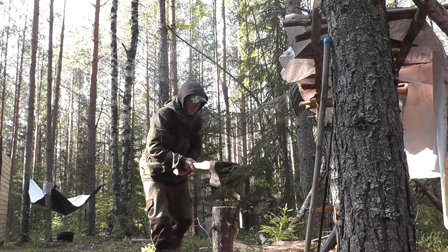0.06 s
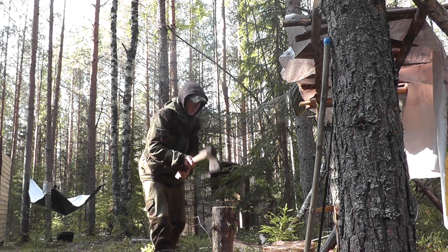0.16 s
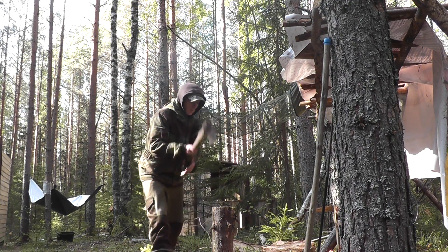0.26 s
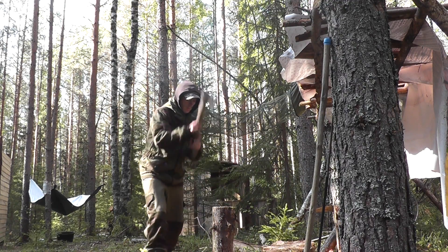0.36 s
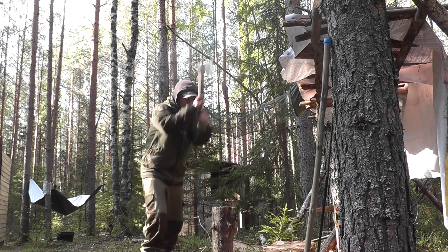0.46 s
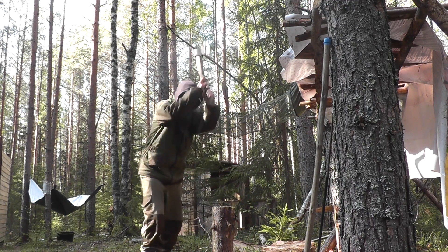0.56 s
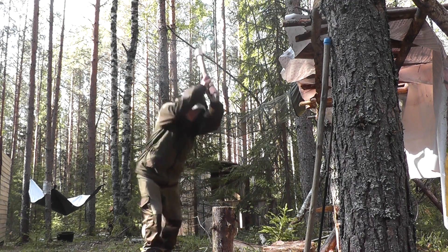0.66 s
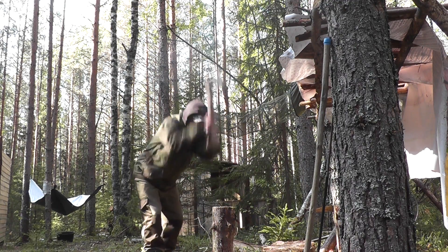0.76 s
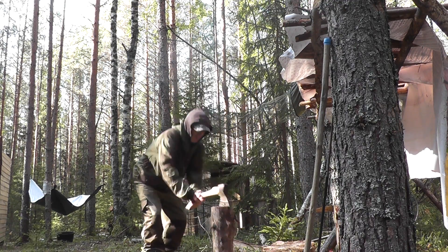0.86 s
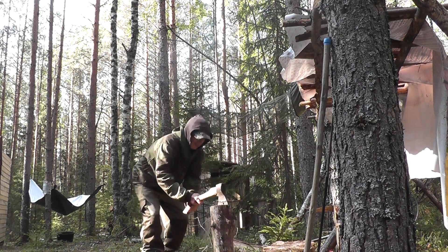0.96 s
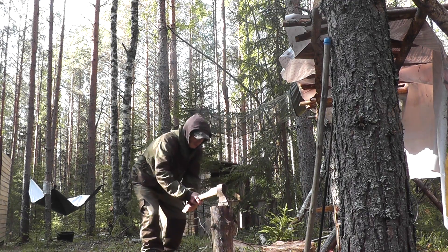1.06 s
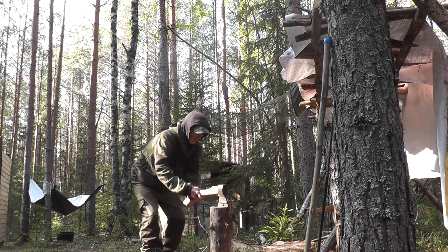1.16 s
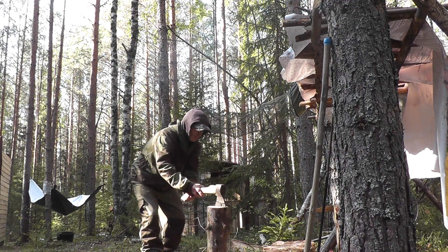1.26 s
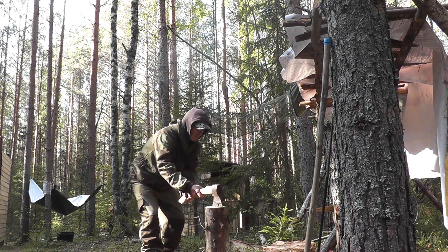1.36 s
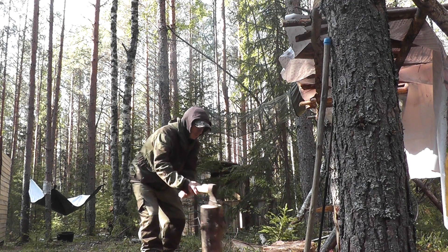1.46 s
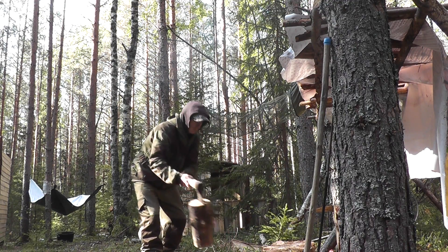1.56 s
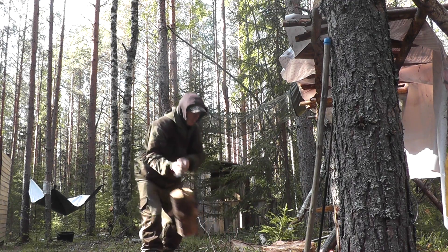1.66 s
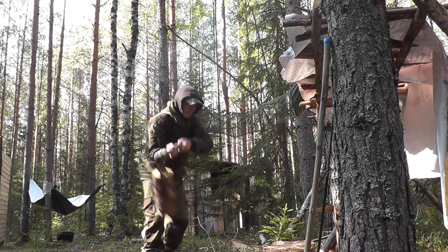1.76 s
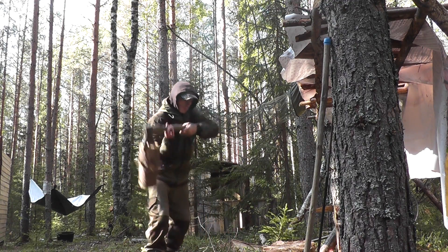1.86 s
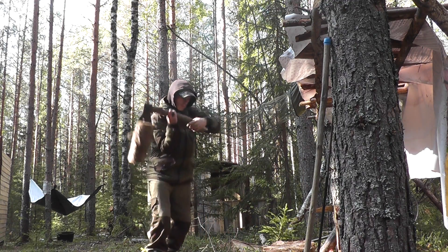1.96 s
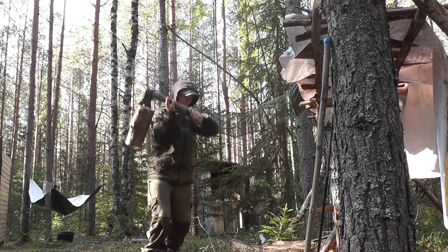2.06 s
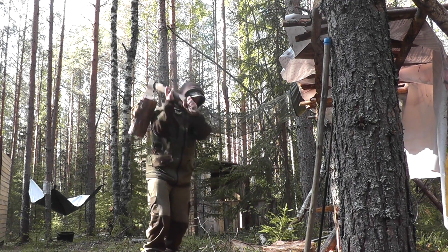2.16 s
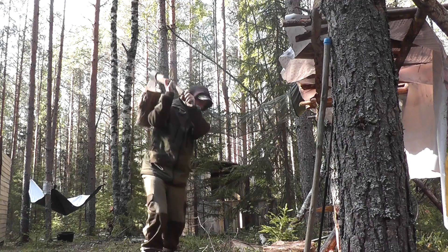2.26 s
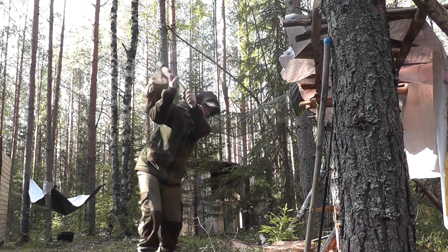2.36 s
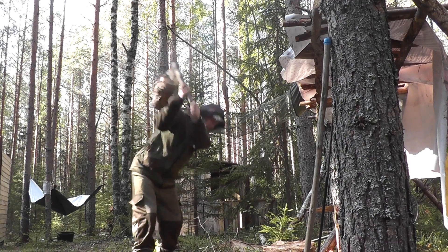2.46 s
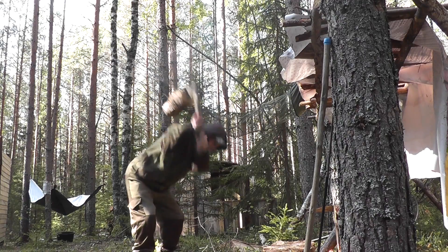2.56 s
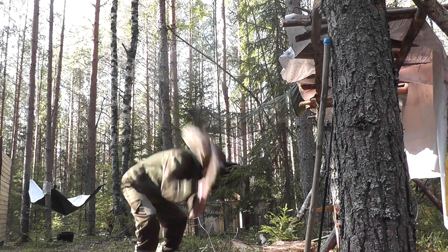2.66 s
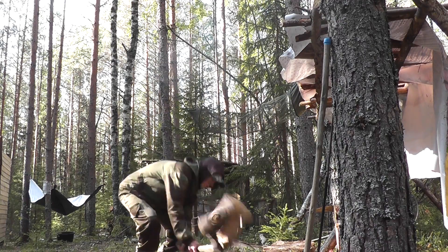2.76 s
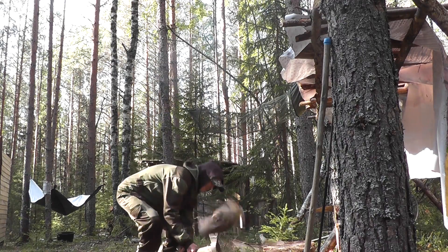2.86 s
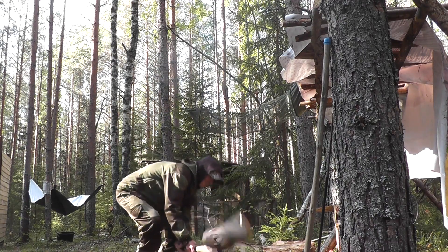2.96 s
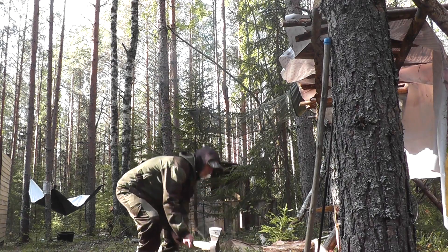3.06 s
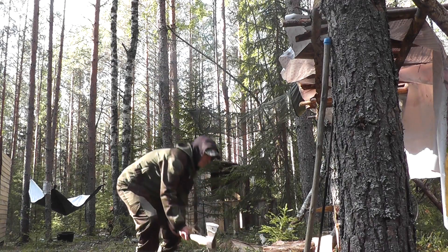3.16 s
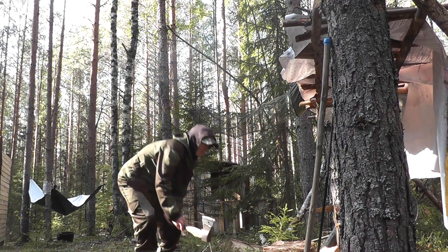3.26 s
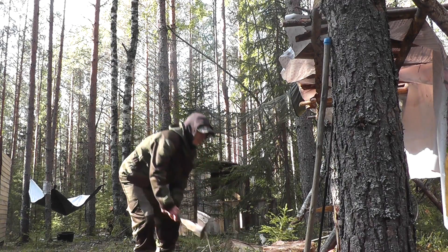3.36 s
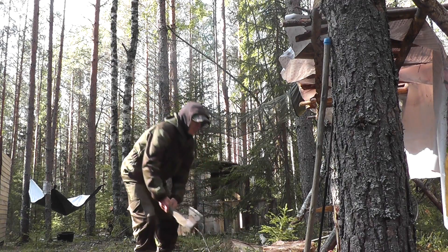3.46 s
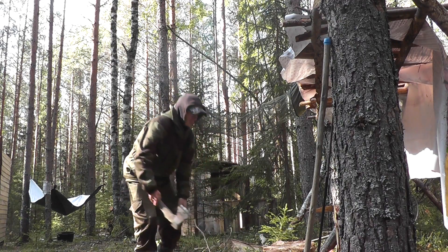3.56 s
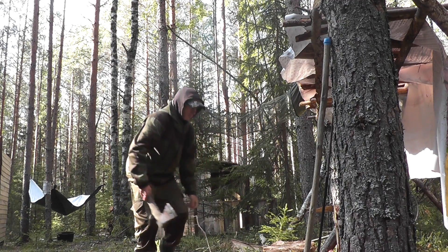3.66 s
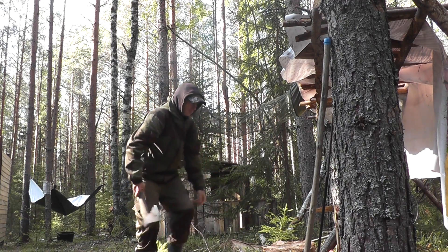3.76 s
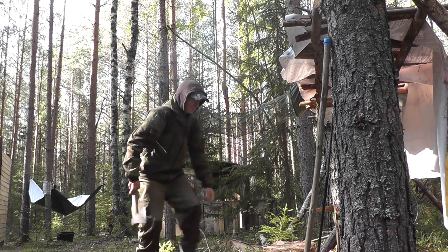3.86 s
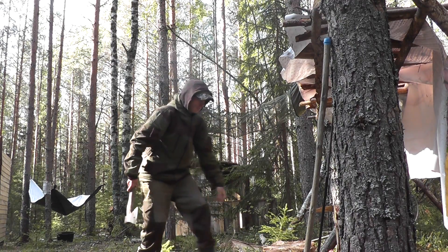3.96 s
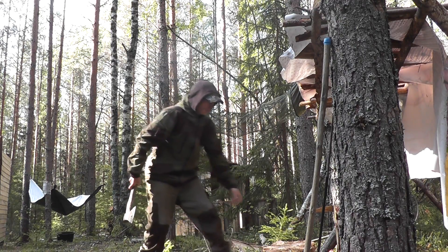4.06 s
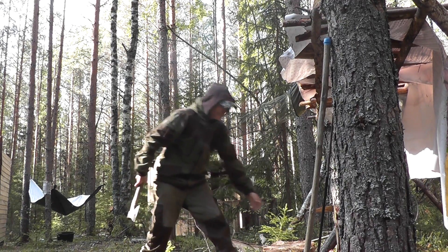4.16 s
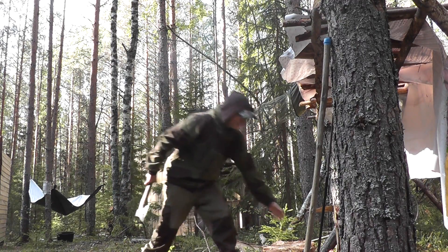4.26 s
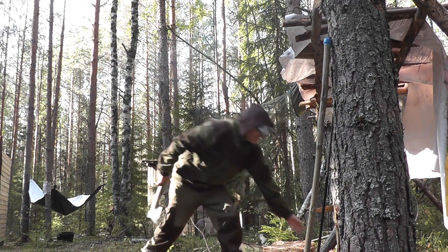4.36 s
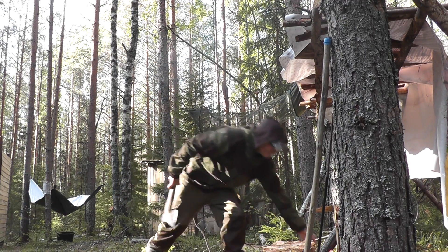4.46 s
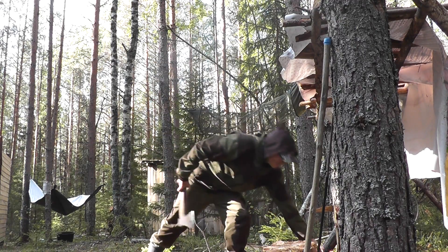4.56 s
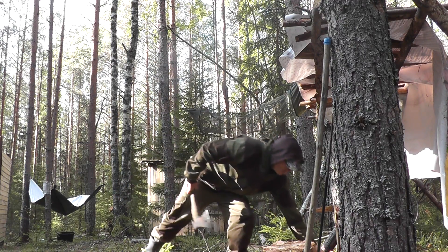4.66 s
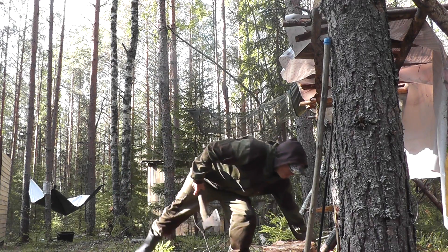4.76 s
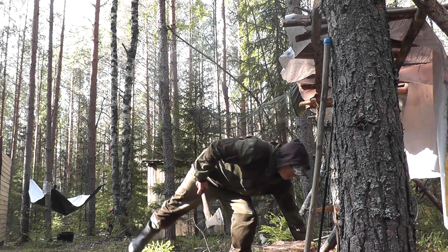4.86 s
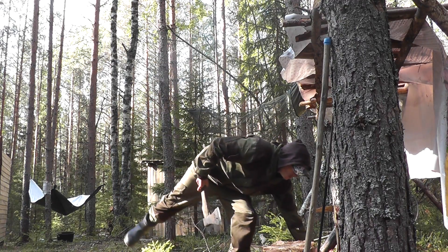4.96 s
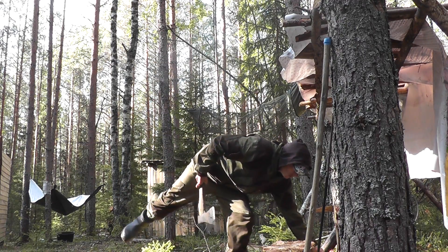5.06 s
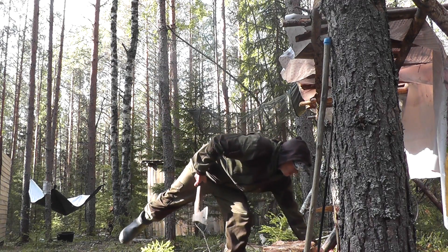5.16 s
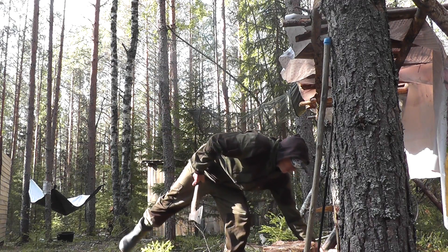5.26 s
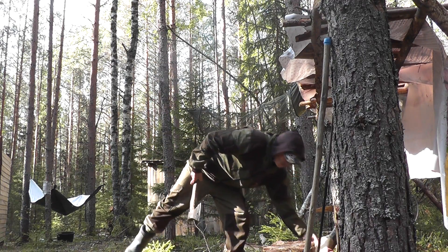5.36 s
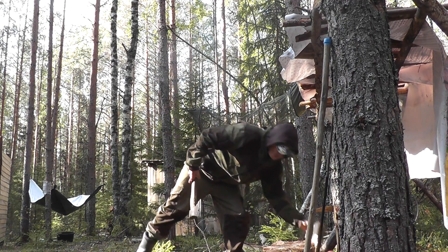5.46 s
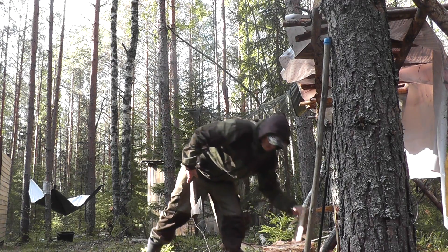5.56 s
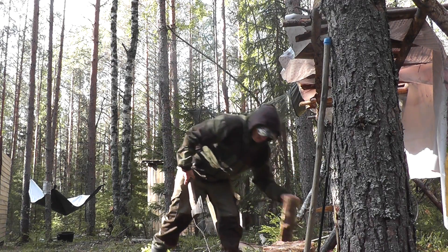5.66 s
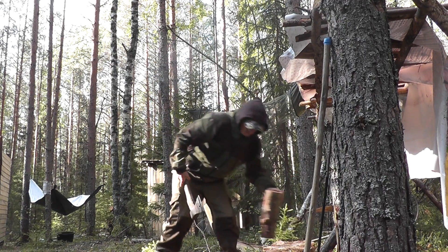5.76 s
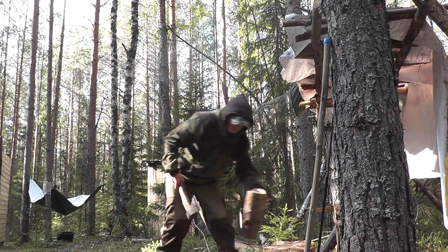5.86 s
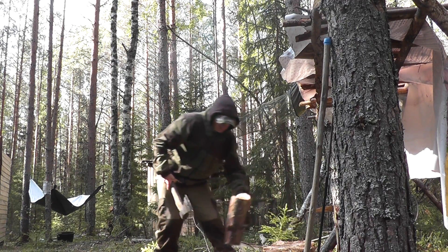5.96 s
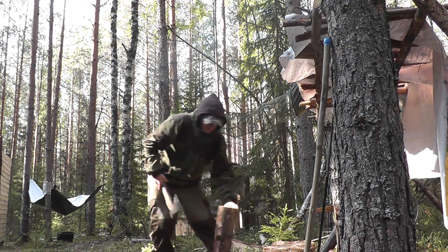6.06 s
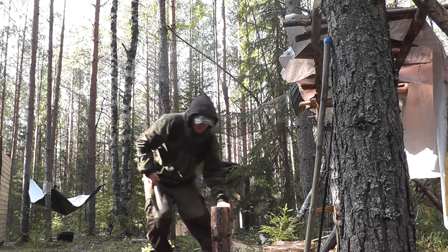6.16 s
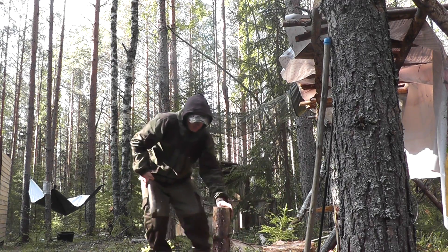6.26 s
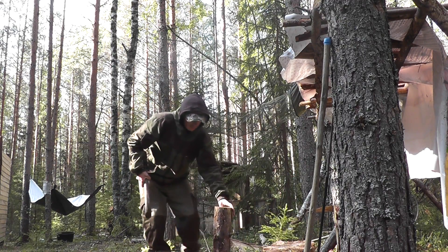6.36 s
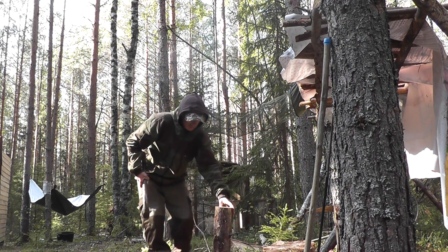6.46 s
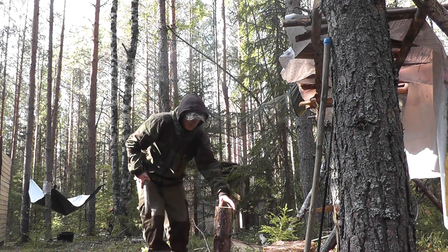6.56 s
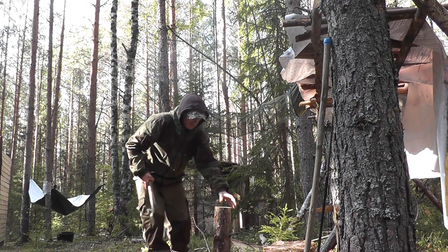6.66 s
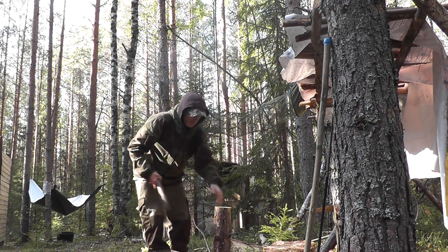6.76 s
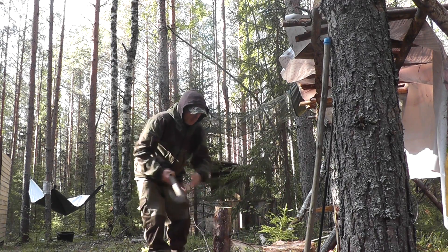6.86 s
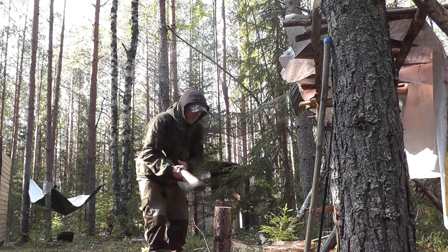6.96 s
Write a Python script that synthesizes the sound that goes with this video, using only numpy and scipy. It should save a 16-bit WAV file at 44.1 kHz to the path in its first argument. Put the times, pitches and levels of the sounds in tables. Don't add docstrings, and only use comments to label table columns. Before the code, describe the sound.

Close stereo pickup beside a chopping stump in a pine forest. Soft wind and jacket rustle, then a hard hatchet chop with a stump boom and long thin echo from the trunks. A second blow cracks the log open; pieces knock and tumble on wood and soil. Afterwards only cloth, scuffing boots, faint birds and a light wooden set-down.

```python
import sys
import numpy as np
from scipy import signal
from scipy.fft import rfft, irfft, next_fast_len
from scipy.io import wavfile
from scipy.ndimage import uniform_filter1d

SR = 44100
rng = np.random.default_rng(int(sys.argv[2]) if len(sys.argv) > 2 else 0)


def log_audio(samples):
    frames = np.atleast_2d(samples).T
    limited = np.clip(frames, -1, 1)
    pcm = np.round(limited * 32767).astype(np.int16)
    wavfile.write(sys.argv[1], SR, pcm)


def elevation(decibels):
    levels = np.asarray(decibels, float)
    return 10 ** (levels / 20)


N = 309141

# [f/Hz, level/dB per Hz]
WIND_COLOUR = [(15, -31), (25, 0), (236, 1.5), (545, -1.5), (863, -6), (988, -9.5), (1520, -14),
               (2220, -23), (3340, -21.5), (4490, -21), (5000, -21.5), (8140, -25), (16000, -34)]
# [f/Hz, likeness/1]
FIELD_LIKENESS = [(60, 0.39), (180, -0.65), (550, -0.15), (1650, 0.12), (4970, 1), (15000, -0.3)]

# [peak t/s, rise/s, fall/s, rub level/dB, hiss
# level/dB]
MOVEMENTS = [(.12, 0.063, 0.036, -55, -60), (.252, 0.13, 0.037, -57.5, -67), (.408, 0.12, 0.038, -52, -60.5),
             (.57, 0.16, 0.045, -50, -57.5), (.78, 0.64, 0.06, -60.5, -66.5),
             (.91, 0.094, 0.13, -56.5, -61.5), (1.21, .05, 0.54, -54, -62), (1.6, 0.28, 0.12, -64.5, -74.5),
             (2.014, 0.15, 0.092, -59, -61.5), (2.356, 0.098, .12, -53.5, -58),
             (2.54, 0.075, 0.078, -63, -61), (2.74, 0.11, 0.061, -61.5, -63), (3.21, .005, 0.16, -69, -46.5),
             (3.39, 0.013, 0.099, -72.5, -50),
             (3.44, 0.054, 0.19, -51, -61.5), (3.67, 0.12, 0.44, -61, -66), (3.891, 0.035, .01, -46.5, -62),
            (4.0, 0.032, 0.31, -58.5, -66.5), (4.139, 0.0088, 0.043, -55.5, -59),
            (4.27, 0.064, .03, -57, -64.5), (4.35, 0.034, 0.045, -60.5, -65.5),
            (4.55, 0.28, 0.14, -62.5, -66), (4.75, 0.049, 0.27, -69.5, -65),
            (5.04, 0.043, 0.032, -67.5, -65.5), (5.4, 0.24, 0.29, -70.5, -67.5),
            (5.82, 0.033, 0.034, -52.5, -62), (6.15, 0.093, 0.24, -57, -63),
            (6.34, 0.051, .015, -65.5, -63), (6.44, 0.032, 0.096, -54, -57.5),
            (6.49, 0.037, 0.074, -72, -55), (6.55, 0.065, 0.043, -54.5, -60),
            (6.923, 0.063, 0.11, -53, -60)]
# [f/Hz, level/dB per Hz]
RUB_COLOUR = [(47, -63), (80, -14), (182, -8), (756, -5), (1010, -11), (1220, -9.5), (2500, -23),
              (3250, -48.5), (5500, -120)]
# [f/Hz, level/dB per Hz]
HISS_COLOUR = [(1180, -35), (2000, -10.5), (3700, -3.5), (4490, -5.5), (5600, -1.5), (8000, -4.5),
               (14700, -23), (16000, -25)]

# [t/s, peak level/dB, t60/s]
SEAMS = [
    (0.078, -49, 0.013),
    (0.3036, -48.5, 0.015),
    (0.3426, -51, 0.014),
    (0.524, -47.5, 0.016),
    (0.8692, -48.5, 0.015),
    (3.4737, -47, 0.014),
    (3.904, -35, 0.015),
]
# [t/s, peak level/dB, tearing/s, tilt/dB per octave]
STROKES = [
    (0.9306, -2, 0.0033, 1),
    (2.8216, -4.5, 0.005, 2),
]
# [t/s, peak level/dB, length/s]
SWISHES = [
    (1.221, -40, 0.022),
    (1.267, -50, 0.06),
    (2.877, -31.5, 0.077),
    (3.85, -53.5, 0.022),
    (4.954, -56.5, 0.014),
    (5.048, -56, 0.015),
    (5.404, -55, 0.014),
    (5.802, -64, 0.025),
]
# [t/s, peak level/dB, tearing/s, t60/s, tilt/dB per octave]
CRACKS = [(1.98, -47.5, 0.004, 0.027, -4), (2.6553, -47, 0.0014, 0.018, 0),
          (2.8289, -10, 0.0041, 0.026, -1.5), (2.9249, -12.5, 0.0055, 0.034, -5.5),
          (2.9329, -13.5, 0.0034, 0.079, -4.5), (3.0172, -28, 0.0052, 0.03, -3),
          (3.1123, -25, 0.0014, 0.087, -2.5), (3.146, -17.5, 0.002, 0.059, -5),
          (3.158, -14, 0.0022, 0.078, -4.5), (3.1741, -13, 0.0063, 0.043, -5.5),
          (3.1991, -20, 0.0036, 0.033, -3.5), (3.2689, -29.5, 0.0046, 0.063, -6.5),
          (3.902, -33, 0.00197, 0.086, -2), (4.1405, -45.5, 0.0053, 0.042, -4.5),
          (4.2523, -49, 0.0058, 0.028, -6), (5.2316, -53, 0.0039, 0.028, -1),
          (6.1397, -43, 0.0024, 0.079, 1.2), (3.378, -33, 0.0036, 0.049, -11.5)]
# [t/s, peak level/dB, t60/s]
TICKS = [(2.9524, -28.5, .04), (2.9889, -30.5, 0.022), (3.238, -36.5, 0.16), (3.3162, -36.5, 0.015),
         (3.3481, -33, 0.028), (3.3848, -47, 0.016), (3.6692, -34.5, 0.005), (4.725, -52, 0.2),
         (4.745, -47, 0.19), (5.483, -52, .024), (6.333, -48, 0.03)]
# [f/Hz, level/dB per Hz]
SNAP_COLOUR = [(410, -31), (700, 7.5), (1560, 1), (2240, -8.5), (2920, -6), (4610, -7.5), (5920, -5),
               (7590, -5), (8760, -5), (10900, -14), (14800, -17.5), (16000, -29)]

# [t/s, peak level/dB, f/Hz]
BUMPS = [(0.13, -38, 227), (2.758, -41.5, 262), (4.137, -36, 114), (4.254, -43, 186), (4.345, -49, 189),
         (5.039, -52, 226), (5.236, -46, 168), (5.802, -37.5, 181.3), (6.4, -40, 505), (6.439, -43, 208),
         (6.461, -41.5, 169), (6.491, -42.5, 328), (6.54, -40, 185), (6.575, -44, 150), (6.592, -47, 188)]
# [t/s, peak level/dB, f/Hz, upper modes level/dB, t60/s]
ON_SOIL = [(0.399, -36.5, 288, 10.5, 0.036), (2.853, -29.5, 186, -6.5, 0.037), (2.884, -23, 207, -7, 0.052),
           (3.055, -26, 378.5, -18, 0.026), (3.113, -31.5, 223, -12, 0.044), (3.182, -13.5, 204, -8, 0.038),
           (3.209, -17, 348, 6, 0.029), (3.304, -24.5, 298, -20, 0.031), (3.409, -26.5, 273, -21, 0.029),
           (3.9065, -13.5, 187.3, -19, 0.028), (6.141, -25.5, 496, -13, 0.031)]
ON_STUMP = [
    (0.933, -11.5, 644, -4, 0.091),
    (0.933, -9, 254.8, -3.5, 0.028),
    (2.824, -16.5, 281, -21.5, 0.026),
    (2.831, -12, 498, -17, 0.021),
    (2.908, -21, 125, -20, 0.1),
]
ON_WOOD = [(2.924, -24, 434, -0.5, 0.11), (2.933, -4, 182, -12, 0.022), (2.965, -26, 240.3, 4, 0.029),
           (3.156, -13.5, 568, 2.5, 0.025), (3.174, -16, 470, -6.5, 0.016),
           (3.1993, -2.5, 287.5, -5, 0.026), (3.234, -24, 306.7, -21, 0.048), (3.265, -24, 279, -22, 0.051),
           (3.277, -8, 352, -4, 0.042), (3.286, -18, 308.7, -7.5, 0.12), (3.429, -37, 169, -25, 0.081),
           (3.849, -41, 309, -17, 0.095), (3.862, -34.5, 335, -18, 0.071), (3.885, -35, 459, -10, 0.076)]
# [t/s, peak
# level/dB, f/Hz, upper modes level/dB, t60/s]
CHIPS = [(0.9345, -21, 1330, -25, .025), (0.947, -22, 540, -25, .045), (2.826, -20, 1420, -25, .03),
         (2.827, -18, 440, -25, .04), (2.960, -30, 1500, -25, .03), (2.991, -32, 1300, -25, .03),
         (3.146, -26, 3100, -30, .015), (3.204, -22, 1250, -25, .04), (3.214, -25, 620, -25, .06),
         (3.901, -37, 1400, -20, .02), (4.135, -43, 520, -15, .02), (2.9255, -21, 3200, -30, .02),
         (2.952, -29, 7300, -50, .07), (0.399, -46, 1100, -12, .02), (6.141, -38, 1350, -14, .02),
         (3.379, -41, 1100, -14, .02), (2.829, -24, 1065, -25, .07), (0.933, -19, 3000, -30, .02)]
# [t/s, peak level/dB, f/Hz]
BOOMS = [
    (0.9389, -10.5, 113.2),
    (2.829, -13, 105),
    (0.974, -25, 150),
    (1.013, -21.5, 126),
    (1.068, -31, 123.6),
    (1.14, -39.5, 97),
]
# [f ratio/1, level/dB, t60 share/1]
LOG_MODES = [(1, 2.5, 0.95), (1.04, -14, 2.3), (1.602, -5, 1.4), (2.3, -4.5, 0.61), (3.6, -6.5, 0.54),
             (4.398, -1, 0.23), (5.9, -9, 0.18)]
# [f/Hz, level/dB, t60/s]
GROUND_MODES = [(57.6, -9, 0.33), (80, -5.5, 0.14), (110.5, -6.5, 0.25), (144.6, -1, 0.11),
                (168, -11, 0.033), (225, -2, 0.14), (115, 7.5, 0.026)]

# [f/Hz, t60/s, level/dB]
TRUNKS = [(60, 0.96, -8.5), (150, 0.41, -6.5), (306.3, 0.27, -8.5), (730, 0.85, -8), (1946, 1, -10.5),
          (6290, .85, -14), (12010, 0.91, -29)]
# [f/Hz, likeness/1]
ECHO_LIKENESS = [(60, 0.48), (180, 1), (550, 0.44), (1650, 0.48), (4970, 0.94), (15000, 0.8)]
# [t/s, level/dB]
CARRY = [(0, -4), (2.7, 4), (2.798, 6.5), (2.899, -3.5), (3.101, 6.5), (3.19, -9), (3.5, -22),
         (3.902, -8.5), (7.1, -1)]

# [t/s, length/s, top f/Hz, level/dB]
BIRDS = [
    (2.41, 0.029, 7200, -72),
    (2.54, .04, 7300, -72),
    (2.67, .045, 7170, -73),
    (5.538, 0.036, 7130, -68),
    (5.645, 0.051, 7280, -67.5),
    (5.75, 0.042, 7310, -63),
]
WARBLE = [
    (4.3, 0.068, 3580, -71.5),
    (4.43, 0.073, 3610, -72),
    (4.93, 0.099, 3800, -75),
    (5.03, .05, 3750, -79),
    (4.92, 0.091, 3320, -79.5),
    (5.2, 0.092, 3280, -77),
    (5.27, .06, 3750, -79),
    (5.33, 0.075, 4150, -76.5),
    (5.4, 0.18, 3880, -77.5),
]
CHIRP = [
    (4.36, 0.025, 2940, -62.5),
    (5.4, 0.034, 2230, -60),
]

# [f/Hz, lead/rad]
LEAD = [(400, -0.021), (850, 0.3), (1980, -0.013), (7150, 0.21), (13000, -0.22), (14300, 0.2),
        (14600, -0.1), (16300, 0.042)]
# [f/Hz, level/dB]
LEAN = [(60, -3.5), (130, -2), (290, -3), (640, 0), (1410, 1.5), (3100, 1), (6820, -0.5), (15000, 0.5)]
# [f/Hz, width/Hz, level/dB]
HOUSING_NOTCHES = [(1012, 68, -5.5), (2227, 210, -6.5), (4535, 340, -6.5), (7630, 190, -6)]


def evened(x):
    return x / np.sqrt(np.mean(x ** 2) + 1e-20)


def read(points, hz, column=1):
    rows = np.array(points)
    return np.interp(np.log(hz + 1), np.log(rows[:, 0] + 1), rows[:, column])


def add(mix, s, sound):
    part = mix[round(s * SR):][:len(sound)]
    part += sound[:len(part)]


def filtered(x, gain):
    size = next_fast_len(x.shape[-1])
    return irfft(rfft(x, size) * gain(np.fft.rfftfreq(size, 1 / SR)), size)[..., :x.shape[-1]]


def coloured(x, points, tilt_db=0, bend_db=0):
    def gain(hz):
        octaves = np.log2(hz / 7000 + 0.012) * (1 + (hz > 7000))
        return elevation(read(points, hz) + tilt_db * octaves - bend_db * octaves ** 2)
    return filtered(x, gain)


def stereo_spectra(draws, likeness):
    a, b, c, d = draws
    same = np.clip(likeness, -1, 1)[:, None]
    left, other = a + 1j * b, c + 1j * d
    return np.array([left, same * left + np.sqrt(1 - same ** 2) * other])


def hush(points, patchy_db, likeness):
    hz = np.fft.rfftfreq(512, 1 / SR)
    *draws, patches = rng.standard_normal((N // 128 + 5, len(hz), 5)).T
    patches = uniform_filter1d(patches, size=8, axis=0)
    patches = evened(uniform_filter1d(patches, size=16, axis=1))
    z = stereo_spectra(draws, likeness(hz)) * elevation(patchy_db * patches)
    noise = signal.istft(z, nperseg=512, noverlap=384)[1][:, :N]
    return evened(coloured(noise, points))


def wind():
    return elevation(-57) * hush(WIND_COLOUR, patchy_db=0.5, likeness=lambda hz: read(FIELD_LIKENESS, hz))


def movement_level(column):
    t = np.arange(0, N + 64, 64) / SR
    power = 0
    for move in MOVEMENTS:
        peak_s, rise_s, fall_s = move[:3]
        away = np.maximum((peak_s - t) / rise_s, (t - peak_s) / fall_s)
        power = power + elevation(move[column] - 10 * away) ** 2
    return np.interp(np.arange(N) / SR, t, np.sqrt(power))


def rustle():
    flicker = elevation(1.5 * evened(uniform_filter1d(rng.standard_normal((2, N)), size=300)))
    rub = hush(RUB_COLOUR, patchy_db=1.2, likeness=lambda hz: np.full_like(hz, 0.9))
    hiss = hush(HISS_COLOUR, patchy_db=2.5, likeness=lambda hz: read(FIELD_LIKENESS, hz) + 0.31)
    rub = elevation(-0.5) * evened(rub * flicker[0]) * movement_level(column=3)
    return rub + evened(hiss * flicker[1]) * movement_level(column=4)


def tears():
    strokes = [(s, db, tear, 0.028, tilt_db, 0.35) for s, db, tear, tilt_db in STROKES]
    fibres = [(*row, 2) for row in CRACKS]
    swishes = [(*row, 0.14, -0.4, 2.5) for row in SWISHES]
    ticks = [(s, db, 0.002, t60, 6, 7) for s, db, t60 in TICKS + SEAMS]
    return strokes + fibres + swishes + ticks


def cracks():
    rows, out, t = tears(), np.zeros(N), np.arange(4096) / SR
    size = len(rows), len(t)
    snaps = rng.standard_normal(size) * elevation(2.6 * rng.exponential(1, size).clip(0, 4))
    lumps = elevation(3.8 * (rng.exponential(1, (len(rows), 64)).clip(0, 4) - 1.5))
    lumps = lumps.repeat(64, axis=1)
    for (s, db, tear, t60, tilt_db, bend_db), snap, lump in zip(rows, snaps, lumps):
        fade = 60 * np.maximum(t - tear, 0) / t60
        shape = elevation(-1.8 * fade) + lump * elevation(-11 - 0.51 * fade)
        shape = shape * np.minimum(t / (0.1 * tear), 1)
        add(out, s, elevation(db - 10.5) * shape * evened(coloured(snap, SNAP_COLOUR, tilt_db, bend_db)))
    return out


def blows():
    bumps = [(*row, -10, 0.064) for row in BUMPS]
    booms = [(*row, -30, 0.053) for row in BOOMS]
    kinds = [(bumps, -10.5), (ON_SOIL, -6.5), (ON_STUMP, -8), (ON_WOOD, -31.5)]
    landings = sorted((*row, thud_db) for rows, thud_db in kinds for row in rows)
    return landings + [(*row, -31.5) for row in booms + CHIPS]


def ring(modes, t, phases):
    out = 0
    for (hz, db, t60), phase in zip(modes, phases):
        out = out + elevation(db - 60 * t / max(t60, .004)) * np.sin(2 * np.pi * (hz * t + phase))
    return out


def knocks():
    out, t = np.zeros(N), np.arange(SR // 3) / SR
    for s, db, hz, upper_db, t60, thud_db in blows():
        detune, phase, soil_detune, soil_phase = rng.random((4, 7))
        modes = []
        for (ratio, mode_db, share), d in zip(LOG_MODES, detune):
            mode_db = mode_db + (upper_db + 6.5) * (ratio > 2) + min(upper_db + 14, 0) * (ratio > 1.5)
            modes.append((hz * ratio * (.97 + .06 * d), mode_db, t60 * share))
        low = ring(modes[:3], t, 0.28 * phase) * np.minimum(t * hz / 0.69, 1)
        touch_s = 0.0018 + 0.00056 * max(-25.5 - db, 0)
        wood = low + ring(modes[3:], t, phase[3:]) * np.minimum(t / touch_s, 1)
        soil = [(f * (.92 + 0.2 * d), g, ring_s) for (f, g, ring_s), d in zip(GROUND_MODES, soil_detune)]
        thud = ring(soil, t, soil_phase) * np.minimum(t / 0.004, 1) / 2
        add(out, s, elevation(db - 2.5) * (wood / abs(wood).max() + elevation(thud_db) * thud))
    return filtered(out, lambda hz: hz ** 2 / (hz ** 2 + 45 ** 2))


def forest(x):
    hz, _, z = signal.stft(x, SR, nperseg=1024, noverlap=768)
    power, wide = abs(z) ** 2, np.clip(hz / 900, 0, 1)[:, None]
    power = (1 - wide) * power + wide * uniform_filter1d(power, size=17, axis=0)
    t = np.arange(300) * 256 / SR
    swell = np.clip(0.68 + t / 0.16, 0, 1) * (t > .02)
    t60, db = read(TRUNKS, hz)[:, None], read(TRUNKS, hz, column=2)[:, None]
    decay = swell * elevation(db - 60 * t / t60)
    uneven = evened(uniform_filter1d(rng.standard_normal(decay.T.shape), size=40)).T
    decay = decay * elevation(3 * uneven)
    power = signal.fftconvolve(power, decay ** 2, axes=1)[:, :z.shape[1]]
    draws = rng.standard_normal(z.T.shape + (4,)).T
    echo = stereo_spectra(draws, read(ECHO_LIKENESS, hz)) * np.sqrt(abs(power))
    return 0.51 * signal.istft(echo, nperseg=1024, noverlap=768)[1][:, :N]


def birds(notes, db, waver):
    t, out = np.arange(SR // 4) / SR, np.zeros(N)
    for s, length, hz, note_db in notes:
        shake = evened(uniform_filter1d(rng.standard_normal(len(t)), size=60))
        u = np.minimum(t / length, 1)
        arch = np.sin(np.pi * u)
        sag = .02 * (1 - arch) ** 2 * (u < 1)
        sung = hz * (1 - sag) * (1 + waver * shake)
        echo = u * elevation(-7 - 60 * t / .8)
        add(out, s, elevation(note_db) * (arch + echo) * np.sin(2 * np.pi * np.cumsum(sung) / SR))
    return elevation(db) * out


def ports(x):
    def gain(hz):
        ripple = 0.8 * (hz / 13000) ** 2 * np.sin(hz / 330)
        half = elevation(read(LEAN, hz) / 2) * np.exp(.5j * (read(LEAD, hz) + ripple))
        return np.array([half, 1 / half])
    return filtered(x, gain)


def overload(dry):
    treble = signal.lfilter(*signal.butter(2, 2500, "high", fs=SR), dry.mean(0))
    leak = signal.lfilter(*signal.butter(2, [100, 1800], "band", fs=SR), treble ** 2)
    return elevation(6) * np.array([leak, -leak])


def housing(hz):
    notch_db = sum(db / (1 + ((hz - dip_hz) / width) ** 2) for dip_hz, width, db in HOUSING_NOTCHES)
    return elevation(notch_db) * hz ** 2 / (hz ** 2 + 40 ** 2) * np.clip((16600 - hz) / 900, 0, 1)


def treble_dropout(x):
    t = np.arange(N) / SR
    gap = np.clip(np.minimum(t - 2.8035, 2.8175 - t) / .0015, 0, 1)
    return x - gap * filtered(x, lambda hz: np.clip(hz / 1000 * 4 - 3, 0, 1))


def scene():
    wood, fibres = knocks(), cracks()
    song = birds(BIRDS, db=3, waver=.006) + birds(WARBLE, db=3, waver=.012) + birds(CHIRP, db=-2, waver=.04)
    air = wind()
    carry = elevation(np.interp(np.arange(N) / SR, *np.transpose(CARRY)))
    tail = forest((wood + elevation(-2) * fibres) * carry)
    return ports(wood + fibres) + tail + song + rustle() + air


def band_limit(x):
    return signal.sosfilt(signal.butter(12, 15850, fs=SR, output="sos"), x)


def record(dry):
    rounded = .9 * np.tanh(dry / .9)
    mix = treble_dropout(filtered(rounded + overload(dry), housing))
    return band_limit(mix)


dry = scene()
out = record(dry)
log_audio(out)
```